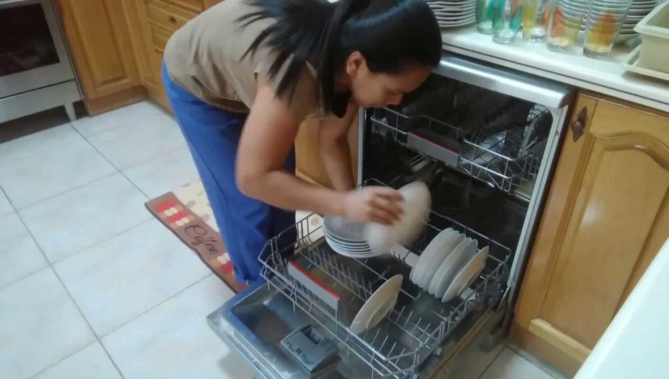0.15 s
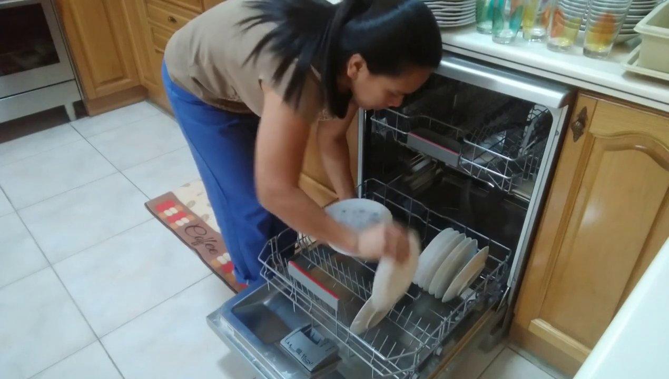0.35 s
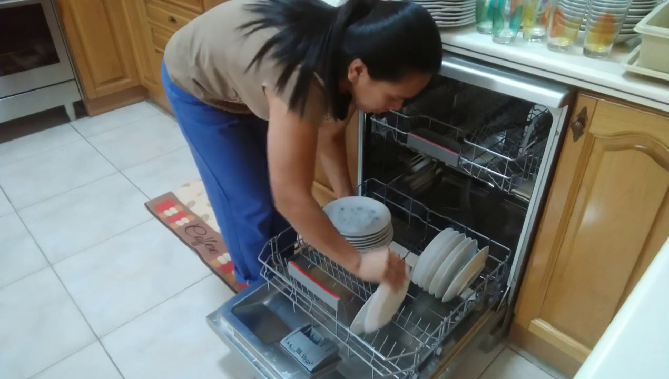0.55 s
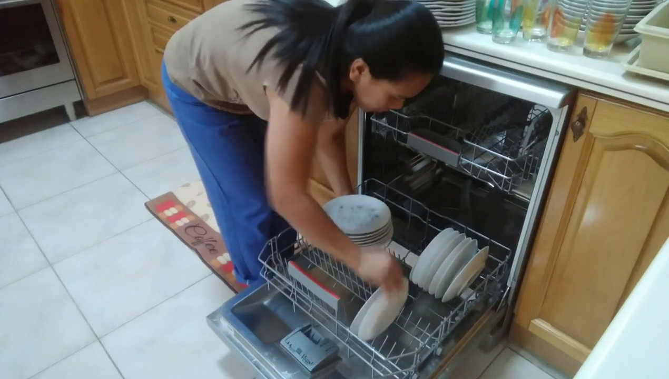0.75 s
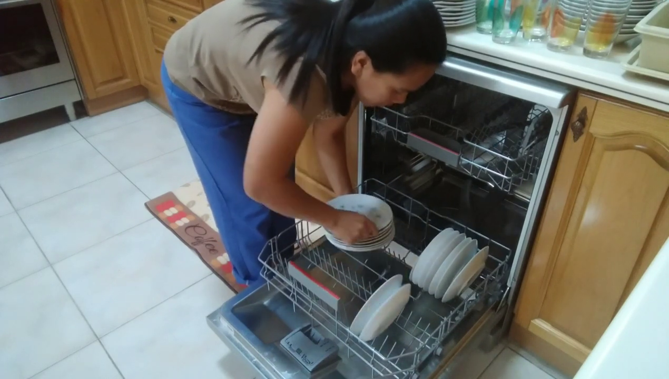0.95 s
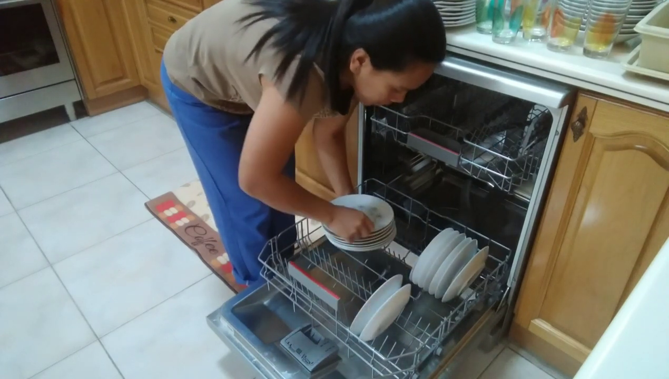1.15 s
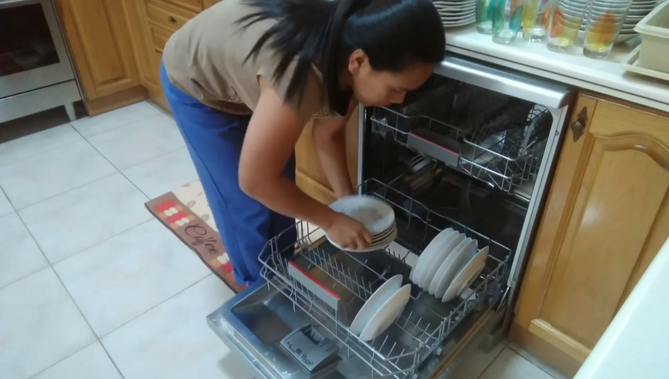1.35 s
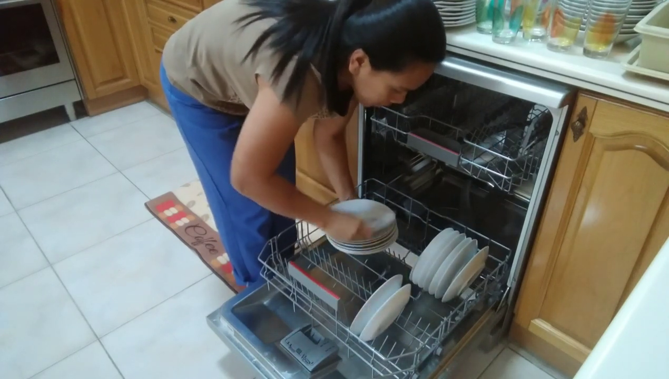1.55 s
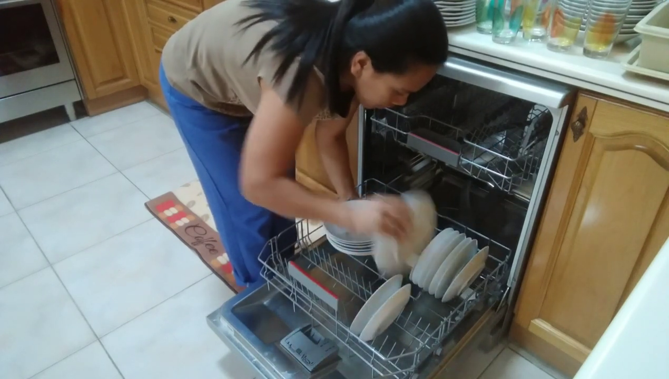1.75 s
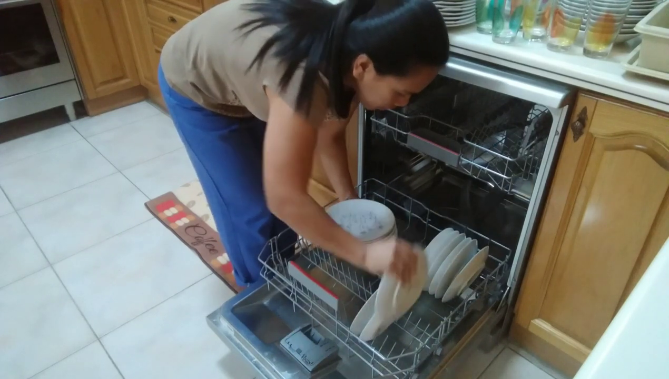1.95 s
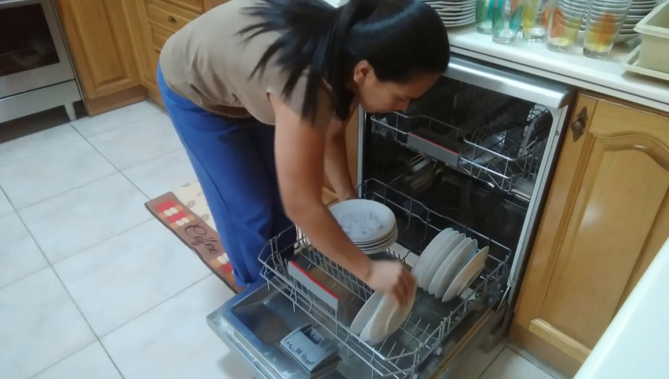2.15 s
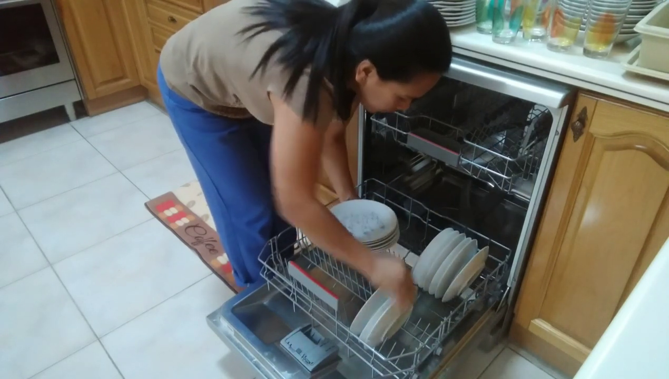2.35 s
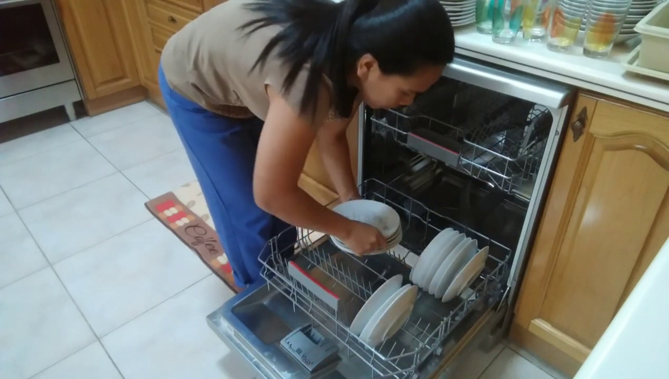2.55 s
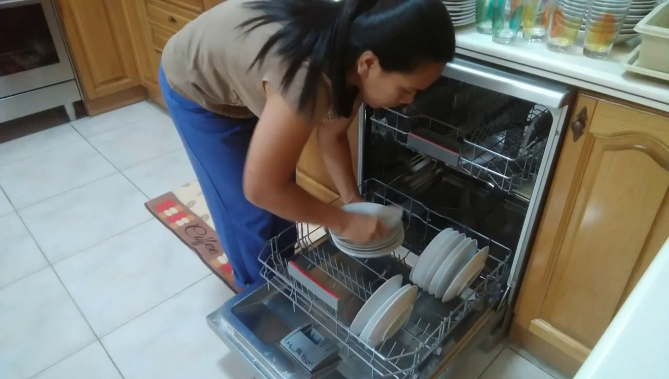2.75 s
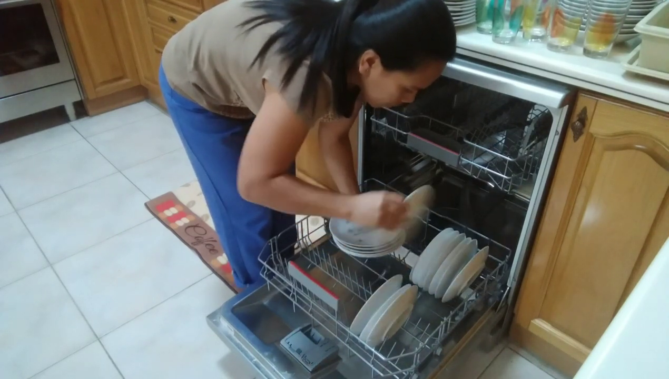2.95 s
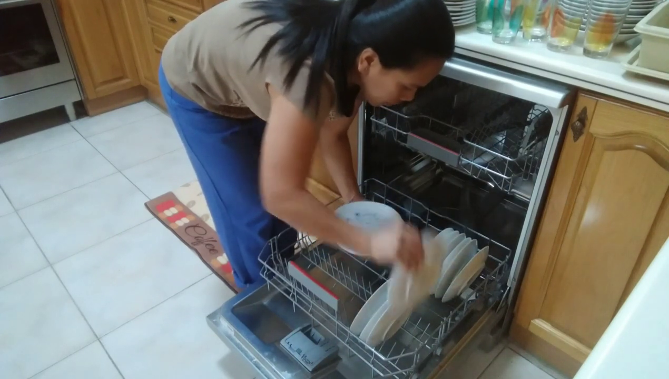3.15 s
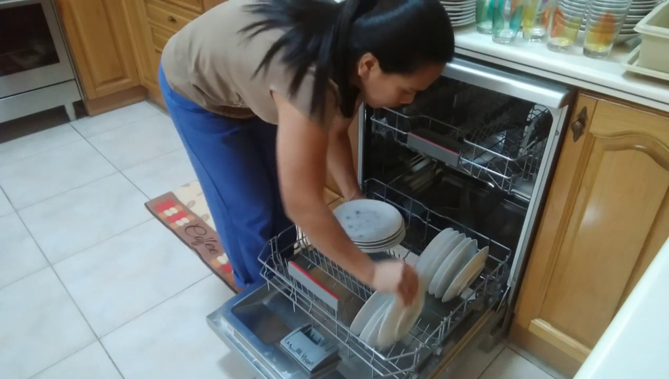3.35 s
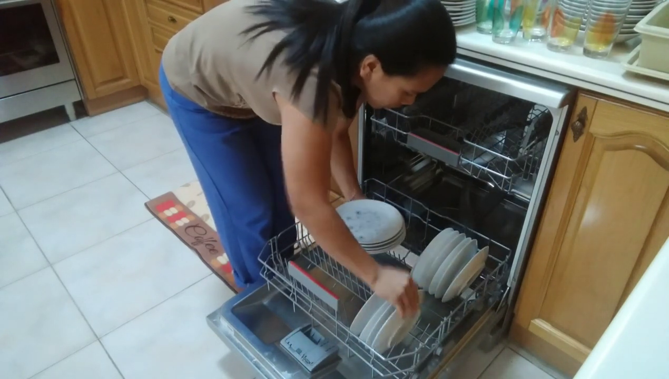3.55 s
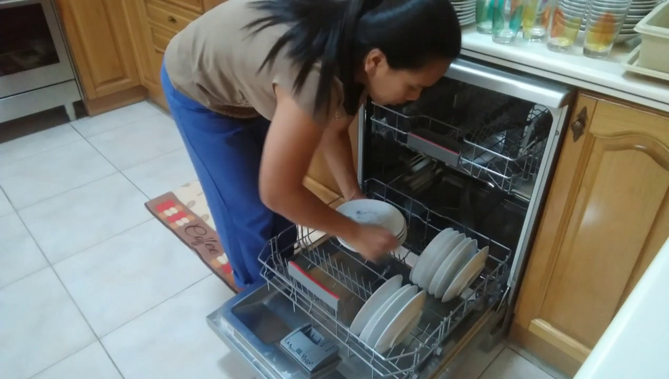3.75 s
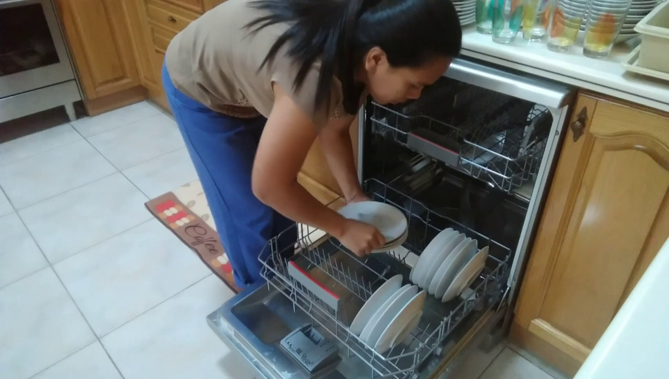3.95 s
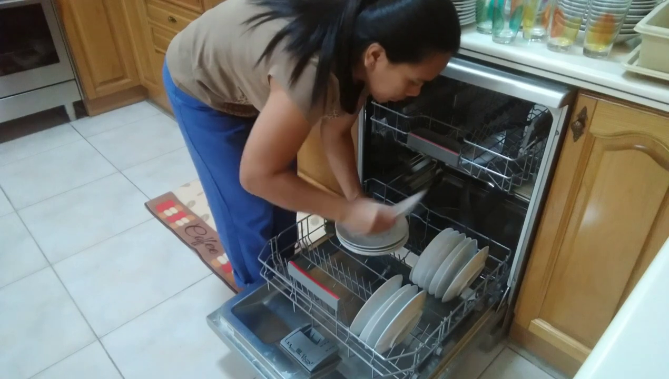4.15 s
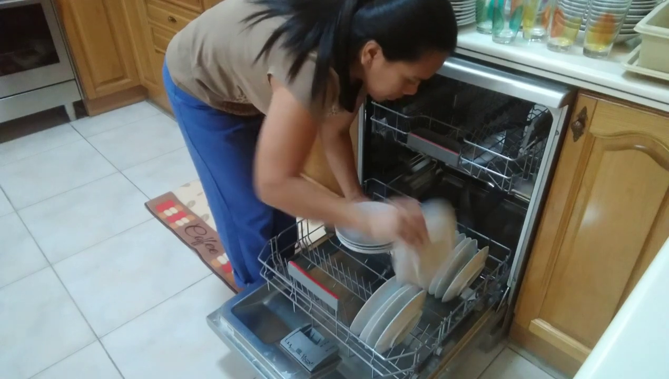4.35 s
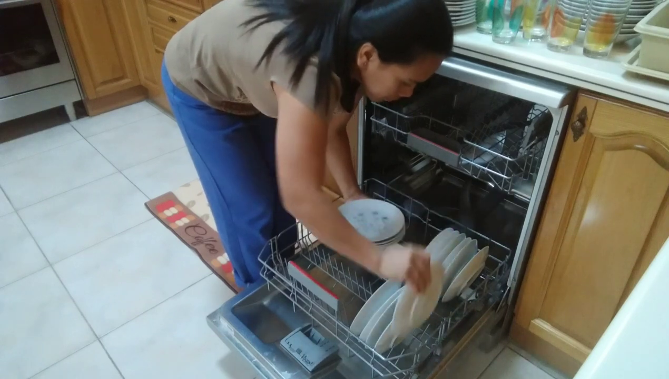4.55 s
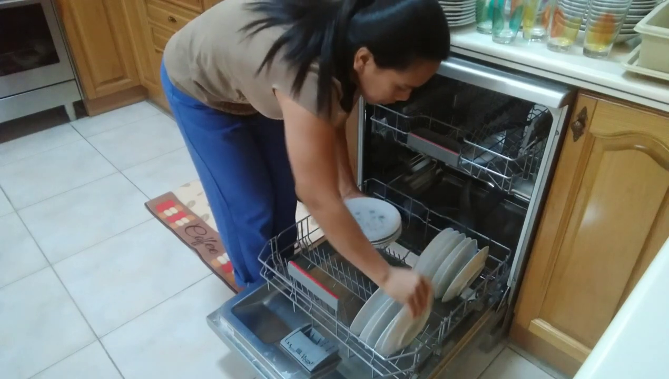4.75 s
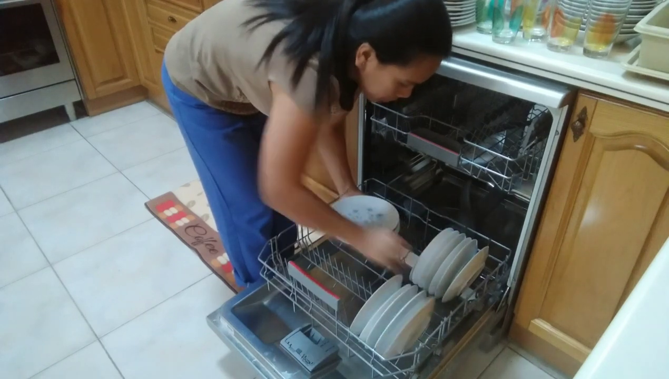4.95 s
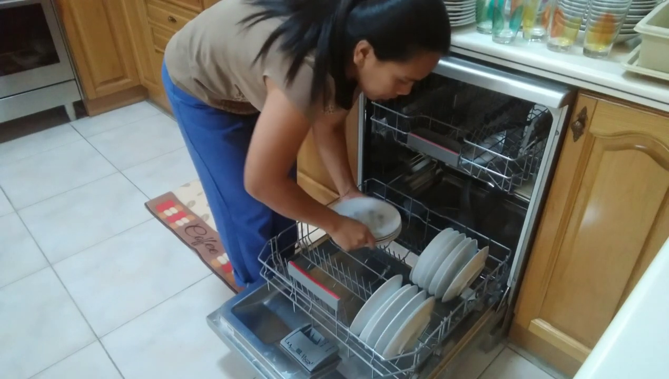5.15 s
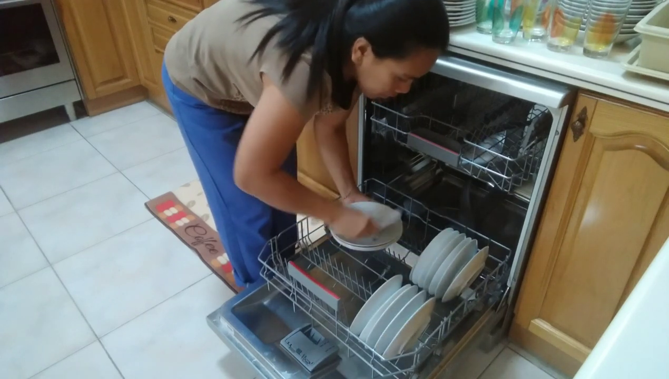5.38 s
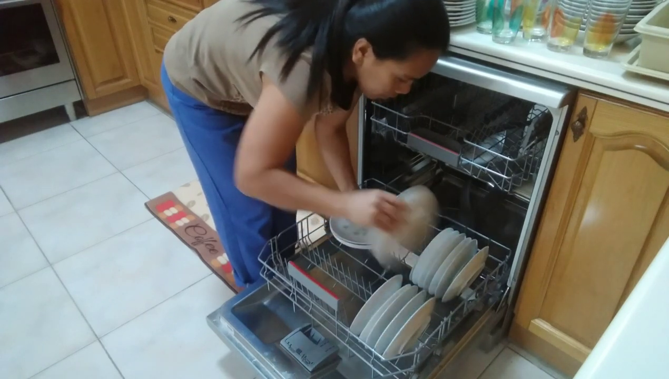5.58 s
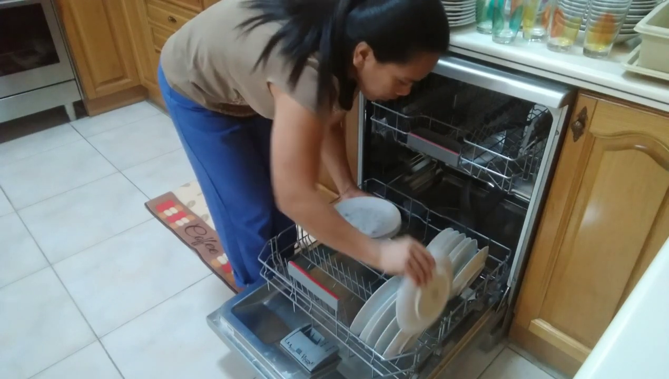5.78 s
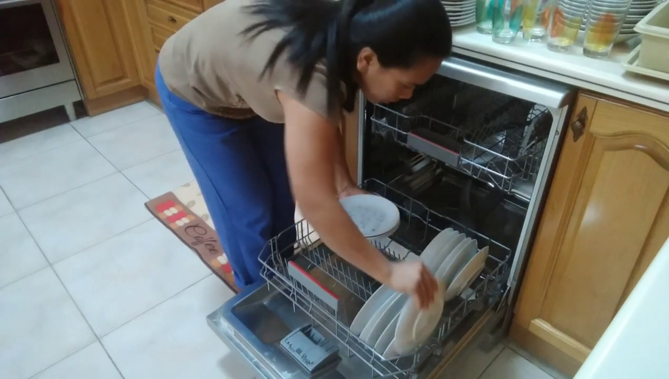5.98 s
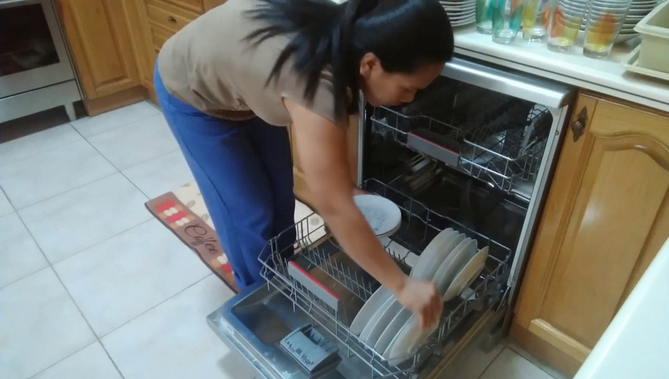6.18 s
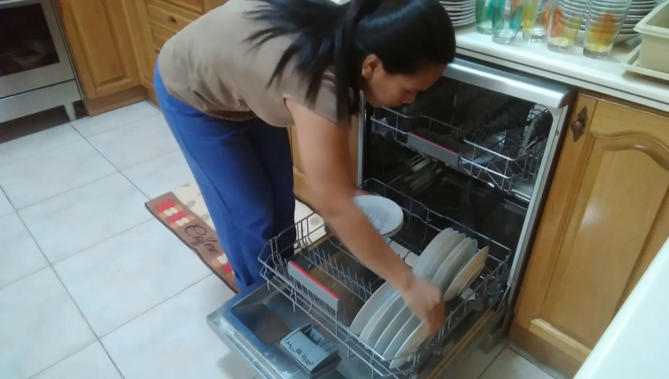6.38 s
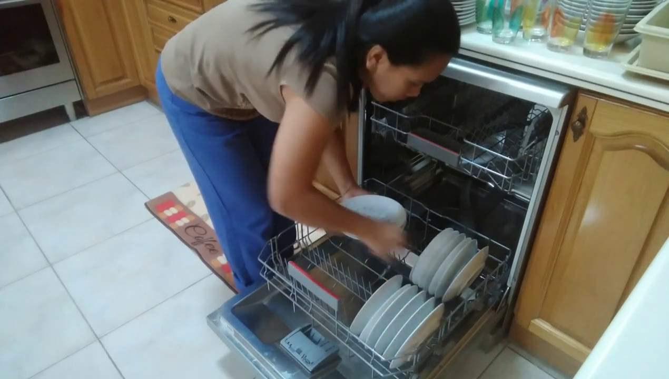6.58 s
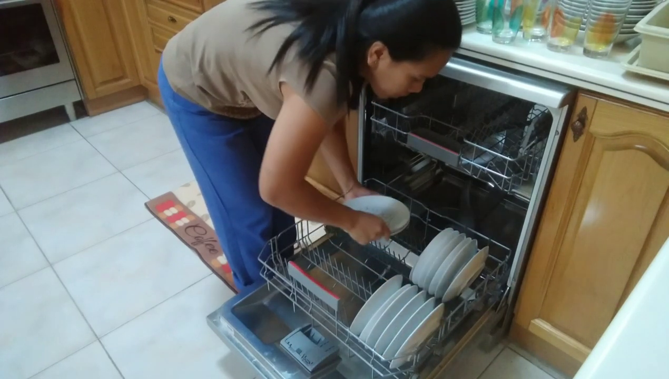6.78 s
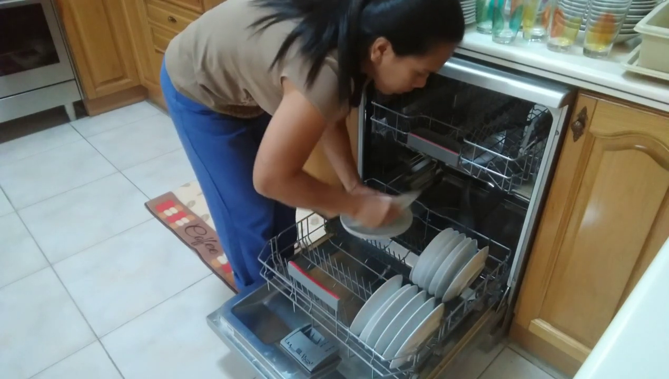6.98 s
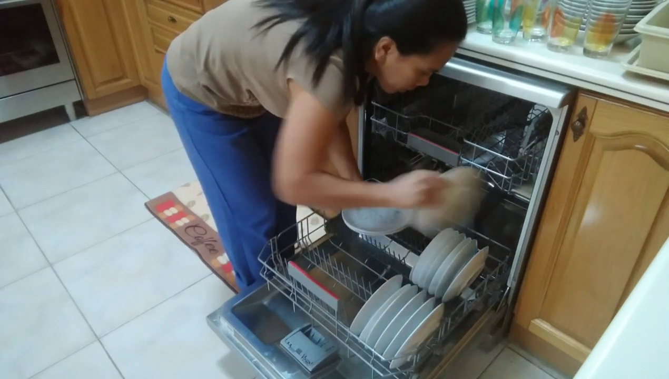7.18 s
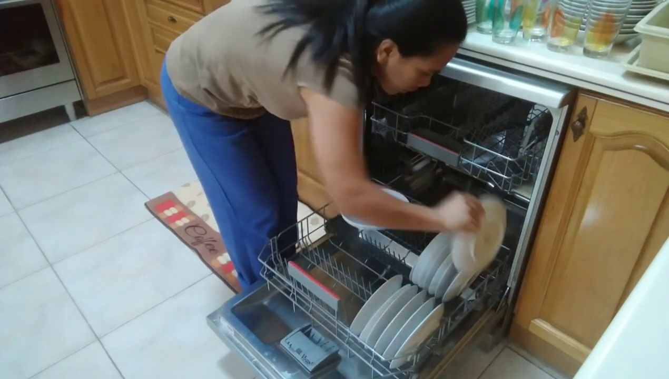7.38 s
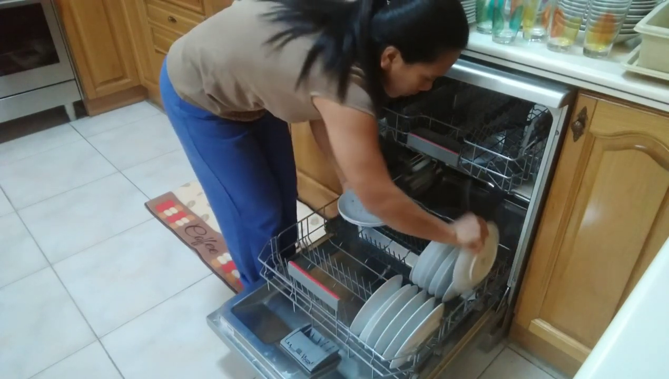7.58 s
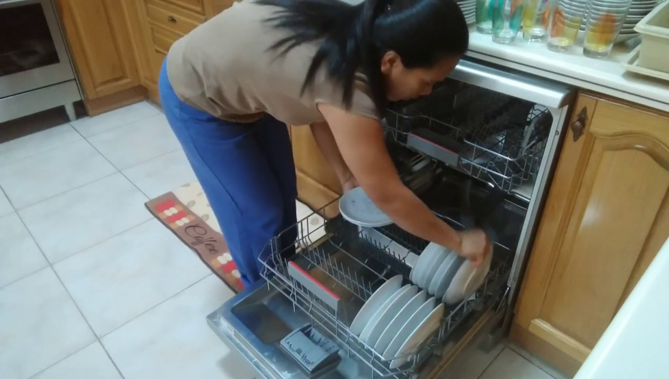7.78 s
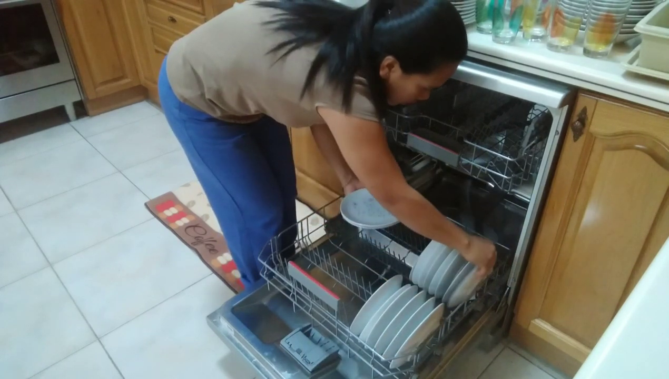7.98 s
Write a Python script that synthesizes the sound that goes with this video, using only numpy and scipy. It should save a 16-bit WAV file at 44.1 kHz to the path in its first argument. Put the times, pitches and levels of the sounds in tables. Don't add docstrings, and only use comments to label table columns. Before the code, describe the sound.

In a tiled kitchen, ceramic plates are pulled singly from a held stack and stood in a dishwasher's wire rack. Each makes a short scrape and hard clack leaving the stack, then a cluster of bright clinks against wire and neighbouring plates. The rings are quickly damped by fingers and rack. Close mono microphone, lively short reverberation, very faint fridge hum.

```python
import sys
import numpy as np
from scipy import signal
from scipy.fft import rfft, irfft
from scipy.io import wavfile
from scipy.ndimage import uniform_filter1d

SR = 44100
rng = np.random.default_rng(int(sys.argv[2]) if len(sys.argv) > 2 else 0)


def wrap_up_sound(samples):
    columns = np.atleast_2d(samples).T
    tamed = np.clip(columns, -1, 1)
    steps = np.round(tamed * 32767).astype(np.int16)
    wavfile.write(sys.argv[1], SR, steps)


def gain_from_db(level_db):
    decades = np.asarray(level_db, float) / 20
    return 10 ** decades


N = 353682
LEAD = SR // 2

TURN_STARTS = [-.5, .46, .66, .78, 1.24, 1.305, 1.44, 2.12, 2.25, 2.57, 2.75, 3.35, 3.47, 3.84, 4.02, 4.66,
               4.88, 4.99, 5.17, 5.26, 5.32, 5.67, 5.76, 6.16, 6.24, 6.7, 6.89, 7.59, 7.74, 7.84]
# frequency in Hz, width in Hz, level in dB.
EARLIER = [(1577.8, 34, 13), (2294, 36.6, -6), (2650, 30.5, 6.5), (8780, 54, -10), (11500, 23, 5)]
NEARING_1 = [(1230, 59, -5), (4500, 39, -6.5), (5300, 63, -13.5), (6452, 36, 10.5), (8310, 40, -8.5),
             (2800, 40, -2)]
RACKED_1 = [(1610.3, 15.4, 3), (2802, 27, -12.5), (3571, 100, 1), (5248, 27, 0.5), (6565, 65, -0.5),
            (8010, 39, -5.5), (10300, 44, -8), (11600, 34, -6), (13100, 57.8, -8)]
SEATED_1 = [(1580, 37, -10), (2758.4, 56, -8), (3505, 82, -11), (4394, 100, -2.5), (5380, 83, -6.5),
            (6674, 64, -5.5), (8393, 36, -16.5), (9710, 69, -2), (10655, 57, -15), (12190, 56, -11.5),
            (12750, 61, -9.5)]
LOOSENED_2 = [(1040, 60, -5.5), (2200, 72, -16), (5300, 51, -12.5), (8390, 49, -15), (11180, 37, -12.5),
              (12490, 27, -24)]
LIFTED_2 = [(1015.5, 46.3, -4.5), (2118, 28, 1.5), (2360, 34, -8), (2649, 44.7, 1.5), (3890, 47, -4.0),
            (5367, 38, 4.0), (6600, 120, -11.5), (7900, 39, -9.5), (8170, 36, -3.5), (8840, 59, -3),
            (10590, 120, 3.0), (13490, 77, 3)]
FREED_2 = [(1260.3, 53.4, 1.5), (2196, 49.7, -2.0), (2813, 33, 0.43), (3488, 22, -7.5), (3742, 86.3, -1.5),
           (3866, 20, -0.5), (6555, 55, -2), (7806, 46, -2.0), (10420, 91, 2.5), (11690, 45, 7),
           (12500, 81, -7.5), (13400, 40, -7)]
RACKED_2 = [(1226, 12, 0), (2720, 26, 2), (3530, 50, -4), (3710, 31, 9), (5162, 110, 7), (6480, 180, -12),
            (8930, 28, -6), (9320, 36, 4.5), (10323, 60, -2), (12435, 48, -17.5), (12467, 47, -13)]
SEATED_2 = [(999.7, 32, -3.5), (2290, 28, -12), (3581, 91, 0.5), (5192, 62, 3.5), (6670, 64, -9),
            (7870, 36, -7.5), (10454, 35, 5), (11570, 37, -16.5), (12050, 130, -9)]
LOOSENED_3 = [(2194, 30, 2), (3796, 49, -7.5), (5540, 63, -5), (6620, 28, -8.5), (10054, 31, -19.5),
              (10380, 39, -12)]
LIFTED_3 = [(2133, 40.8, 7), (3397, 61, -1.5), (3868, 29, -8), (5090, 31, -1.5), (5869, 120, -5.5),
            (6845, 50, -5), (7870, 29, -1.5), (8650, 30, -6), (9920, 94, -10.5), (10050, 32, 2.5),
            (11110, 41, -2.5), (11800, 35, -5), (12400, 38, -7)]
RACKED_3 = [(2515, 12.6, 2), (3670, 50.6, 1), (5366, 89, -3), (6515, 28, -6.5), (10842, 44, -3.5)]
SEATED_3 = [(2496, 20, -9), (4332, 90, -3.5), (5312, 44, 0.5), (6818, 56, -9), (8260, 59, -11),
            (9340, 34, -17), (10537, 57, -4), (11952, 63, -9), (12870, 48, -9)]
LIFTED_4 = [(990, 84, 0.5), (2102, 72, -2), (3740, 43, -8), (6170, 60, -5), (7580, 35, -16.5),
            (10080, 330, -8.5), (11390, 55, -7.5), (13300, 33, -8.5)]
FREED_4 = [(1270, 49, -5), (2290, 21, -3), (3613, 35, 1), (3750, 44, -8), (5310, 70, -9), (7760, 70, -9.5),
           (8840, 64, -9), (10440, 43, -10), (11160, 130, -1.5), (11510, 190, -7.5), (12170, 31, -13),
           (13370, 41, -10.5)]
RACKED_4 = [(1254.4, 26, -4), (2202, 33, -7.5), (3426, 39, -0.5), (3725, 29, -5.5), (5094, 37, -4),
            (5240, 26, -9.5), (6280, 75, -12), (7990, 82, -8.5), (9990, 41, -7)]
SEATED_4 = [(1270.5, 45, -13.5), (3570, 73.6, -2.5), (5290, 46, 4), (6420, 27, -13), (7690, 27, 0.5),
            (10376, 58, 0), (11126, 25, -6.5), (13050, 46, -10)]
SETTLED_4 = [(1207.5, 57, -12), (3522, 66, -3), (5117, 82, 2), (6182, 48, -10), (10473, 68, 4),
             (12400, 32, -16.5), (13100, 24, -1)]
LOOSENED_5 = [(1017, 42, 2.5), (2323, 34, -7), (3397, 140, -23.5), (5297, 38, -1.5), (6140, 26, -7.5),
              (7890, 29, -18.5), (8130, 41, -5), (9940, 36.3, 7), (10600, 39, -4.5), (11500, 164.4, -3)]
TIPPED_5 = [(1000, 148.9, -8.5), (4095, 170, -17.5), (5520, 24, -5.5), (6530, 36, -7), (9060, 30, -4.5),
            (10000, 32, -4.5), (11594, 58, -3), (12860, 76, 1)]
LIFTED_5 = [(1223, 76, -11.0), (2211, 71.6, 0.5), (3577, 42, -1), (3824, 23, -6.5), (5290, 71, -3),
            (6535, 64, -5.0), (8030, 97, -12.5), (8660, 42, -4.5), (10762, 36, 1.5), (11500, 54, -8.0),
            (13200, 41, -9)]
RACKED_5 = [(2174, 62, 1), (3610, 27, 0), (4913, 34, 2), (6250, 40, -7.5), (8380, 110, -2.5),
            (9531, 19, 7.5), (10550, 65, 5.5), (11450, 54, -0.5), (12540, 47.8, -4), (13412, 54, -4)]
LEANED_5 = [(1642, 7.83, -9.0), (2107, 39, -6.5), (3392, 52, 0.0), (3600, 51.3, 2.5), (6257, 38, -4),
            (7800, 38, -10.5), (8350, 75, -1.5), (9460, 32, -8.5), (10410, 64, -10.0), (11350, 33, -7.0),
            (12140, 41, -11.5), (13500, 67, -9.5)]
NUDGED_5 = [(2206, 30, -18.5), (3404, 46, -6), (4840, 69, 5), (5470, 31.4, 9), (6580, 26.6, -21.5),
            (7996, 25, -1), (10160, 28, 0.5), (11370, 56, -5.0)]
SEATED_5 = [(1173, 47, -13.5), (2210, 45, -6), (3550, 54, 0.5), (5195, 90, -3.5), (6600, 95, -16), ]
LIFTED_6 = [(861.2, 27, 7), (1969, 110, -1.5), (5014, 46, -17), (5520, 31, -8), (8740, 95, -13),
            (10000, 50, -14.5), (10700, 91, -10), (11620, 23, 1.5), (12900, 58, -4.5)]
FREED_6 = [(2117, 61, -6), (3671.5, 51, -4.5), (5200, 85, -6), (6513, 133, -3.5), (8620, 59, -3),
           (9344, 47, -17), (10440, 140, -11.5), (11600, 78, 3.5), (12670, 31, -11.5), (13090, 29, -3),
           (13500, 38, -10.5)]
RACKED_6 = [(3483, 84, 3.5), (5094, 81, -0.5), (6334, 62, -1), (7750, 72, -4), (8400, 40, -14.5), ]
NUDGED_6 = [(1234, 33, -3), (3473, 74, -14.5), (4835, 52, 6.5), (5408, 34, 3.5), (6520, 35, -3.5),
            (8650, 36, -14.5), (10500, 58, -9.5)]
SEATED_6 = [(3478, 116, 1.5), (5130, 60, -9.5), (6276, 36, -0.5), (6770, 28, -4), (7576, 19, -5),
            (10210, 110, -4), (11000, 150, -10), (12700, 34, -11.5), (14000, 130, -8.5)]
# frequency in Hz, width in Hz, level in dB.
PLATE_MODES = [EARLIER, NEARING_1, RACKED_1, SEATED_1, LOOSENED_2, LIFTED_2, FREED_2, RACKED_2, SEATED_2,
               LOOSENED_3, LIFTED_3, RACKED_3, SEATED_3, LIFTED_4, FREED_4, RACKED_4, SEATED_4, SETTLED_4,
               LOOSENED_5, TIPPED_5, LIFTED_5, RACKED_5, LEANED_5, NUDGED_5, SEATED_5, LIFTED_6, FREED_6,
               RACKED_6, NUDGED_6, SEATED_6]
GRIP = [2.3, 1.28, 2.01, 1.27, 2.66, 2.94, 3.49, 1.52, 1.94, 1.6, 1.9, 2.3, 1.506, 2.7, 2.46, 2.1, 1.82,
        1.6, 5, 3, 1.8, 1.25, 1.55, 2.6, 1.77, 4.37, 2.65, 2.26, 2, 2.2]
# time in seconds, peak in dB, bare crack against ring in dB, brightness in dB.
STACK_BLOWS = [(-.12, -5.5, 1, -4), (1.251, -35, 19, -13.5), (1.312, -4.5, 7.5, -5),
               (1.317, -9.5, 2.5, -1.5), (1.449, -8, 5, -3.5), (1.49, -17.5, 1.5, -12.5),
               (1.513, -13.5, 4.5, -4), (2.76, -2.5, 2, -7), (2.776, -12, 7, 2), (3.855, -24, 8.5, -0.5),
               (3.887, -17, 9, -5.5), (4.007, -19.5, 1.5, -7), (4.03, -16.5, 11, -5), (4.047, -12, 6, -8),
               (5.184, -12, 8, -9), (5.272, -14.5, 8.5, -6.5), (5.2, -12.5, 2.5, -12),
               (5.33, -6.5, 2, -7.5), (6.757, -18, 12.5, -8), (6.775, -22.5, 3.5, -4.5),
               (6.901, -11, 6.5, -10.5), (6.909, -13.5, 3, -9.5)]
# time in seconds, peak in dB, bare crack against ring in dB, brightness in dB.
RACK_BLOWS = [(0.476, -44.5, 13, -11.5), (0.561, -30.5, 1, -10), (0.678, -17.5, -7, -5),
              (0.74, -11.5, -2, -10), (0.75, -14, -1, -6.5), (0.784, -3, -9.5, 4.5), (0.925, -17.5, 5, -4),
              (2.137, -21.5, -15.5, 5), (2.164, -13, 7.5, 4.5), (2.255, -13.5, -5, -2),
              (2.263, -11, 1, -10.5), (2.27, -10, 1.5, -11.5), (2.282, -16, -13.5, -9),
              (2.298, -23.5, -8, 2.5), (3.364, -26.5, -5, 16), (3.384, -14, 0.5, -1),
              (3.405, -6.5, -25.5, -3.5), (3.484, -9.5, -3, 2), (3.491, -10, -2.5, -10),
              (3.508, -16, -6, -9.5), (3.589, -17, 3, -15.5), (4.68, -22, 4, -5.5),
              (4.719, -19.5, -17.5, -16.5), (4.832, -24.5, -18.5, -13.5), (4.892, -21.5, -2, -20),
              (4.935, -7.5, -30.5, -3), (4.945, -12.5, -3, -12.5), (4.978, -11, -15, -4),
              (5.003, -11.5, -15, 2), (5.056, -18, -10.5, -11.5), (5.688, 2, 1.5, 1),
              (5.702, -15, -3.5, -9), (5.767, -10, -14, 4.5), (5.797, -14, -13, 2.5), (6.173, -23.5, 6, -6),
              (6.255, -12.5, -6, -9.5), (7.609, -25.5, 1, -24), (7.635, -11.5, -2, -15.5),
              (7.648, -21, -0.5, -5.5), (7.697, -27.5, -3.5, -20), (7.752, -10, -5, -8.5),
              (7.852, -13.5, -9, -2), (7.865, -19.5, -1, -8), (7.973, -26.5, 0, -16.5)]
# start in seconds, length in seconds, plate chatter in dB, rack shake in dB.
SLIDES = [(.47, 0.254, -50.5, -50), (1.26, 0.2115, -10.5, -42.5), (1.36, 0.229, -7, -74.5),
          (2.14, 0.0867, -10.5, -36), (2.19, 0.1505, -21, -24), (2.58, 0.1484, -16, -36),
          (3.45, 0.2588, -18, -31.5), (3.93, 0.2, -16.5, -63), (4.86, 0.1407, -11.5, -25),
          (5.73, 0.1313, -19.5, -35.5), (6.72, 0.057, -20.5, -49.5)]
# start in seconds, length in seconds, plate chatter in dB, rack shake in dB.
JOLTS = [(.68, 0.056, -24, -39), (.748, 0.3526, -15, -27), (3.375, 0.362, -19.5, -34),
         (3.855, 0.338, -27, -47.5), (4.678, 0.256, -21, -39), (4.99, 0.2625, -14, -41),
         (5.185, 0.058, -15.5, -40.5), (5.325, 0.064, -9, -61.5), (5.695, 0.0442, -23.5, -27),
         (6.175, 0.2, -18, -38.5), (6.255, 0.121, -24, -27), (7.61, 0.202, -22.5, -30.5),
         (7.85, 0.129, -25, -34.5)]
# time in seconds, frequency in Hz, level in dB, t60 in seconds.
SINGING_RIMS = [(.678, 1598, -34.5, 1.28), (.742, 1584, -26, 0.52), (2.185, 1226, -31, .4),
                (4.933, 5300, -25, 0.315), (6.725, 873, -34, 0.306), (2.136, 3550, -18, 0.0516),
                (2.262, 2290, -29, 0.88), (2.77, 3368, -30, 0.738), (3.364, 3670, -23.5, 0.085),
                (4.72, 3300, -33, 0.36), (4.932, 3570, -18.5, 0.22), (5.77, 1580, -34.5, 0.92),
                (6.235, 2232, -27, 0.42)]
# frequency in Hz, density in dB per Hz.
CONTACT_SPECTRUM = [(290, -78), (500, -8.5), (2160, -2.5), (3020, -6.5), (3390, -3.5), (7310, -7),
                    (10400, -6), (16000, -11)]
# frequency in Hz, t60 in seconds, level in dB.
STACK_HOLLOW = [(802.3, 0.099, -1.5), (862.6, 0.11, -1), (1079.4, 0.033, 10.5), (1193.2, 0.28, -0.5)]
# frequency in Hz, width in Hz, level in dB.
RACK_MODES = [(225.3, 42.8, 9), (271.4, 117, 9.5), (393, 139, 8.5), (662, 292, 5), (1192.5, 180, 2.5)]
# frequency in Hz, t60 in seconds.
KITCHEN_DECAY = [(150, 0.67), (500, 0.732), (2000, 0.774), (5000, 0.698), (10000, 0.44), (16000, 0.35)]
# frequency in Hz, density in dB per Hz.
AIR_SPECTRUM = [(24, -91.5), (163, -31.5), (189, -2), (345, -8.5), (942, -6.5), (1300, -10), (6650, -26),
                (16000, -22)]
# frequency in Hz, rms level in dB.
COMPRESSOR_LINES = [(199, -56), (274, -56), (301, -62), (400, -55), (899, -61)]

RING_DB, CHATTER_DB = -15.5, -12


def at_hz(points, hz):
    points = np.array(points)
    return np.interp(np.log(np.maximum(hz, 1)), np.log(points[:, 0]), points[:, 1])


def rms_one(x):
    return x / np.sqrt(np.mean(x ** 2) + 1e-20)


def coloured(spectrum, size):
    hz = np.fft.rfftfreq(size, 1 / SR)
    white = rng.standard_normal(size)
    return rms_one(irfft(rfft(white) * gain_from_db(at_hz(spectrum, hz)), size))


def ring(clicks, hz, t60):
    radius, angle = gain_from_db(-60 / (t60 * SR)), 2 * np.pi * hz / SR
    feedback = [1, -2 * radius * np.cos(angle), radius * radius]
    return signal.lfilter([0, np.sin(angle)], feedback, clicks + 1e-18)


def grains(per_s, spread_db):
    size = N + LEAD
    heights = gain_from_db(spread_db * np.minimum(rng.exponential(1, size), 3))
    heights = heights * rng.choice([-1, 1], size)
    return rms_one(heights * (rng.random(size) < per_s / SR))


def turn_at(s):
    return np.searchsorted(TURN_STARTS, s) - 1


def struck():
    common_clink_hz = 3550
    stack, in_rack = (-28, 0.607, -8), (-37.5, .6, 0.1)
    rows = []
    for blows, (knock_db, follows, clink_db) in ((STACK_BLOWS, stack), (RACK_BLOWS, in_rack)):
        for blow in blows:
            modes = PLATE_MODES[turn_at(blow[0])]
            clink_hz = min((abs(hz - common_clink_hz), hz) for hz, width, db in modes)[1]
            rows.append((*blow, knock_db + follows * blow[1], clink_hz, clink_db))
    return np.array(sorted(rows))


def plates(chatter, damping, scatter_db, split):
    out, blows = np.zeros(N + LEAD), struck()
    stagger = round(.0025 * SR)
    luck = rng.standard_normal((len(blows), 60))
    turn_ends = TURN_STARTS[1:] + [N / SR]
    for start, end, modes, grip in zip(TURN_STARTS, turn_ends, PLATE_MODES, GRIP):
        mine = (blows[:, 0] >= start) & (blows[:, 0] < end)
        peak_db, bright_db = blows[mine, 1], blows[mine, 3]
        first = round(start * SR) + LEAD
        span = slice(first, first + round((end - start) * SR) + SR // 3)
        rub = chatter[span] * (np.arange(len(out[span])) < (end - start) * SR)
        at = np.round(blows[mine, 0] * SR).astype(int) + LEAD - first
        loudest_db = max(level_db for hz, width, level_db in modes)
        for k, (hz, width, level_db) in enumerate(modes):
            t60 = np.clip(damping / (grip * width), .02, .3)
            hardness_db = (bright_db + 8) * np.log2(hz / 4000) / 3
            for side in (-1, 0, 1):
                clicks = rub * np.sqrt(1 / (t60 * SR))
                chance_db = scatter_db * luck[mine, 3 * k + side + 1]
                clicks[at + stagger * (side + 1)] += gain_from_db(peak_db + RING_DB + hardness_db + chance_db)
                height = (-1) ** (k + side) * gain_from_db(level_db - loudest_db) * np.sqrt(0.068 / t60)
                out[span] += height * ring(clicks, hz + split * grip * width * side, t60)
    return signal.sosfilt(signal.butter(2, 550, "high", fs=SR, output="sos"), out)


def favoured(x, modes):
    spread_hz, between_db = 210, -12
    hz = np.fft.rfftfreq(len(x), 1 / SR)
    top_db = max(db for f, width, db in modes)
    humps = [gain_from_db(0.53 * (db - top_db)) / (1 + ((hz - f) / (spread_hz + width)) ** 2) for f, width, db in modes]
    return rms_one(irfft(rfft(x) * (gain_from_db(between_db) + np.max(humps, axis=0)), len(x)))


def contact(size, length_s):
    t = np.arange(size) / SR / length_s
    spray = t * np.exp(-t) * rng.standard_normal(size) ** 3
    return spray / np.sqrt(np.sum(spray ** 2))


def cracks(rise_s, short_s, long_s, long_db):
    crack_level_db, hollow_level_db = -9, -2.5
    clink_level_db, clink_t60_s = -6.5, 0.032
    low_hz, high_hz, shimmer_db, shimmer_t60_s = 6467, 14866, -31.5, 0.13
    t = np.arange(SR // 5) / SR
    out = np.zeros(N + LEAD + len(t))
    decay = gain_from_db(-60 * t / short_s) + gain_from_db(long_db - 60 * t / long_s)
    shape = (1 - np.exp(-(t / rise_s) ** 2)) * decay
    shimmer_shape = (1 - np.exp(-t / rise_s)) * gain_from_db(-60 * t / shimmer_t60_s)
    fine_hz = low_hz + (high_hz - low_hz) * rng.random((len(TURN_STARTS), 30))
    tap = np.arange(len(t)) == 0
    for s, peak_db, crack_db, bright_db, hollow_db, clink_hz, clink_db in struck():
        turn = turn_at(s)
        tilt = [(f, db + (bright_db + 9.5) * np.log2(f / 4000) / 2) for f, db in CONTACT_SPECTRUM]
        burst = shape * favoured(coloured(tilt, len(t)), PLATE_MODES[turn])
        touch = contact(size=len(t), length_s=0.00285)
        knock = sum(gain_from_db(db + 2 * rng.normal()) * ring(touch, hz, t60) for hz, t60, db in STACK_HOLLOW)
        clink = ring(tap, clink_hz * 1.1, clink_t60_s) + ring(tap, clink_hz * 0.91, clink_t60_s)
        heights = gain_from_db(peak_db + bright_db + shimmer_db + 6.8 * rng.standard_normal(30))
        shimmer = heights @ np.sin(2 * np.pi * np.outer(fine_hz[turn], t))
        at = round(s * SR) + LEAD
        span = slice(at, at + len(t))
        out[span] += shimmer * shimmer_shape
        out[span] += gain_from_db(peak_db + crack_db + crack_level_db) * burst
        out[span] += gain_from_db(hollow_db + hollow_level_db) * knock
        out[span] += gain_from_db(peak_db + RING_DB + clink_level_db + clink_db) * clink
    return out[:N + LEAD]


def kitchen(x, first_s, build_s):
    t, echo = np.arange(SR) / SR, 0
    edges = 100 * 2 ** np.arange(0, 7.6, .5)
    for low, high in zip(edges, edges[1:]):
        band_pass = signal.butter(2, [low, high], "band", fs=SR, output="sos")
        band = signal.sosfilt(band_pass, rng.standard_normal(SR))
        echo = echo + band * gain_from_db(-60 * t / at_hz(KITCHEN_DECAY, np.sqrt(low * high)))
    echo = echo * np.clip((t - first_s) / build_s, 0, 1)
    return signal.fftconvolve(x, echo / np.sqrt(np.sum(echo ** 2)))[:len(x)]


def background():
    t, lines = np.arange(N) / SR, 0
    for hz, db in COMPRESSOR_LINES:
        waver = rms_one(ring(rng.standard_normal(N), hz, 0.42))
        lines = lines + gain_from_db(db) * (0.539 * np.sin(2 * np.pi * hz * t) + 0.233 * waver)
    return gain_from_db(-56) * coloured(AIR_SPECTRUM, N) + lines


def moving(rows, rise, start_db, end_db):
    out = np.zeros((2, N + LEAD + SR))
    for s, length, chatter_db, shake_db in rows:
        part, at = np.linspace(0, 1, round(length * SR)), round(s * SR) + LEAD
        shape = np.interp(part, [0, np.clip(rise, .01, .99), 1], [start_db, 0, end_db])
        out[:, at:at + len(part)] += gain_from_db(shape + [[chatter_db], [shake_db]])
    return out[:, :N + LEAD]


def rasp():
    noise = coloured(CONTACT_SPECTRUM, N + LEAD)
    edges = [round(s * SR) + LEAD for s in TURN_STARTS] + [N + LEAD]
    parts = [favoured(noise[a:b], modes) for a, b, modes in zip(edges, edges[1:], PLATE_MODES)]
    return np.concatenate(parts)


def rack(shake):
    jolts, body = grains(per_s=700, spread_db=3.0), 0
    for k, (hz, width, db) in enumerate(RACK_MODES):
        body = body + gain_from_db(db) * (-1) ** k * rms_one(ring(jolts, hz, 1.865 / width))
    return shake * rms_one(body)


def singing(rise_s):
    age, out = np.arange(SR) / SR, np.zeros(N + LEAD + SR)
    for s, hz, db, t60 in SINGING_RIMS:
        at = round(s * SR) + LEAD
        envelope = gain_from_db(db - 60 * age / t60) * (1 - np.exp(-age / rise_s))
        out[at:at + SR] += envelope * np.sin(2 * np.pi * hz * age)
    return out[:N + LEAD]


def scene():
    sliding = moving(SLIDES, rise=.65, start_db=-16, end_db=-19)
    slide, shake = sliding + moving(JOLTS, rise=0.071, start_db=2.2, end_db=-19)
    touches = grains(per_s=1100, spread_db=4.0)
    grain_decay = gain_from_db(-60 * np.arange(SR // 50) / SR / 0.026)
    grain = signal.fftconvolve(np.abs(touches), grain_decay)[:N + LEAD]
    close = plates(slide * gain_from_db(CHATTER_DB) * touches, damping=4.7, scatter_db=4.0, split=.4)
    close = close + slide * gain_from_db(CHATTER_DB - 4.5) * rms_one(grain * rasp())
    close = close + gain_from_db(-4) * rack(shake)
    close = close + cracks(rise_s=0.0021, short_s=0.052, long_s=0.12, long_db=-8)
    close = signal.sosfilt(signal.butter(2, 170, "high", fs=SR, output="sos"), close)
    heard = close + gain_from_db(-0.5) * kitchen(close, first_s=0.0009, build_s=0.0027)
    heard = (heard + singing(rise_s=0.0024))[LEAD:] + background()
    return np.tile(heard, (2, 1))


def noise_fill(x, from_hz, share, peaky_db):
    width_hz = 690
    hz, _, tiles = signal.stft(x, SR, nperseg=2048, noverlap=1024)
    noise = signal.stft(rng.standard_normal(x.shape), SR, nperseg=2048, noverlap=1024)[2]
    for low in np.arange(from_hz, 16000, width_hz):
        band = (hz >= low) & (hz < low + width_hz)
        power = np.abs(tiles[0, band]) ** 2
        mean = power.mean(axis=0)
        peaky = 10 * np.log10(power.max(axis=0) / mean)
        runs = rms_one(uniform_filter1d(rng.standard_normal(len(peaky)), size=4))
        steady = mean < 30 * np.roll(mean, 2)
        chosen = steady & (peaky + 1.5 * runs < peaky_db + share * low / 10000)
        level = np.sqrt(mean / np.mean(np.abs(noise[:, band]) ** 2, axis=1))
        tiles[:, band] = np.where(chosen, noise[:, band] * level[:, None], tiles[:, band])
    return signal.istft(tiles, SR, nperseg=2048, noverlap=1024)[1][:, :N]


def low_pass(x):
    return signal.sosfilt(signal.butter(12, 16650, fs=SR, output="sos"), x)


def record(dry):
    limit_db, release_db_s = -16, 58
    level_db = 20 * np.log10(uniform_filter1d(np.abs(dry[0]), size=256) + 1e-9)
    over = np.maximum(level_db - limit_db, 0)
    fall = release_db_s * np.arange(N) / SR
    held = np.maximum.accumulate(over + fall) - fall
    smooth = np.exp(-1 / (0.0011 * SR))
    duck_db = np.roll(signal.lfilter([1 - smooth], [1, -smooth], held), -60)
    limited = .8 * np.tanh(dry * gain_from_db(-.6 * duck_db) / .8)
    cut = signal.sosfilt(signal.butter(1, 60, "high", fs=SR, output="sos"), limited)
    cut = signal.sosfilt(signal.cheby2(14, 30, 15950, fs=SR, output="sos"), cut)
    mix = noise_fill(cut, from_hz=4130, share=1.3, peaky_db=4.5)
    return low_pass(mix)


dry = scene()
out = record(dry)
wrap_up_sound(out)
```